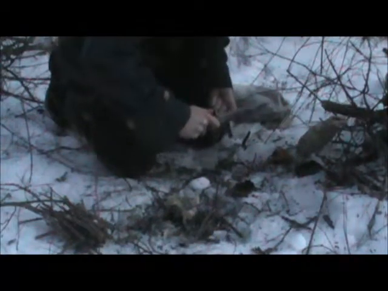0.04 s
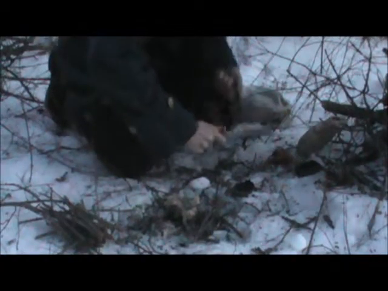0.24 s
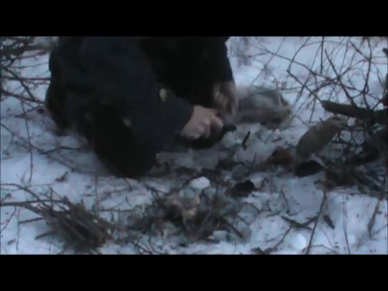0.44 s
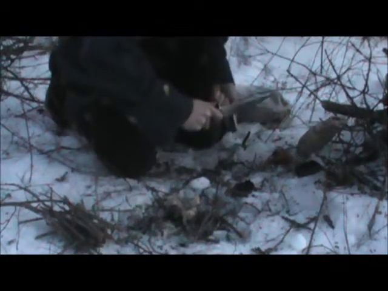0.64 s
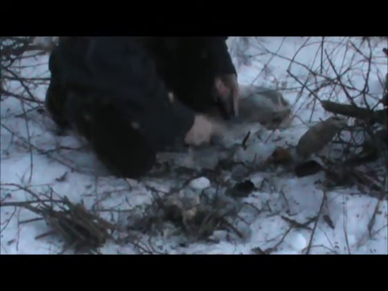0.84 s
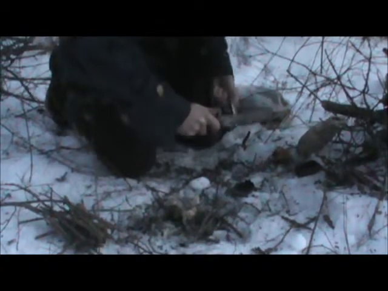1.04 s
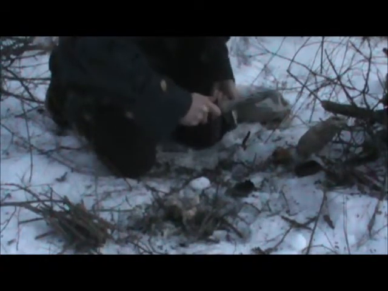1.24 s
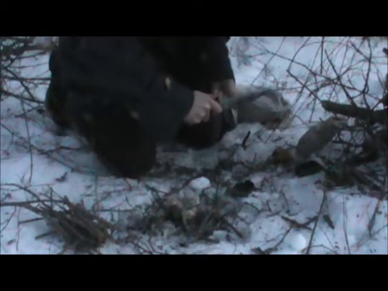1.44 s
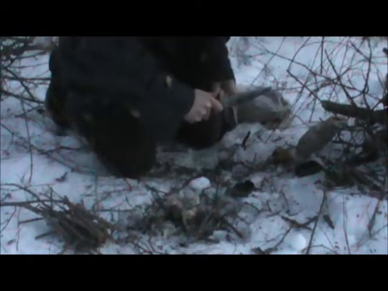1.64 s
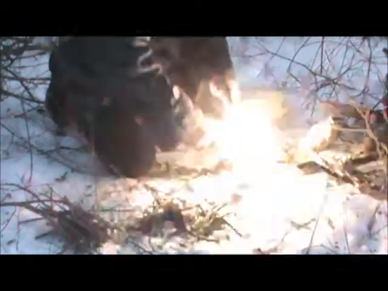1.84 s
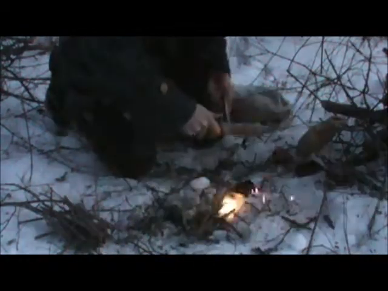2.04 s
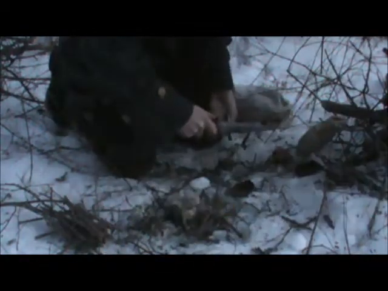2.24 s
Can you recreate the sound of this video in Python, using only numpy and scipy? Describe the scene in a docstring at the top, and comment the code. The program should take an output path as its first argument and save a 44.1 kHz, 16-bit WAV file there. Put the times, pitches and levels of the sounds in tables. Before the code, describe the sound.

Three fast strokes of a blade on a sparking rod, each a gritty zip with a metallic click, small resetting taps between, the last followed by crackling sparks; quiet open woods, faint low bumps, nearby microphone.

```python
"""A soft outdoor hush of shaped noise with scattered low bumps lies under everything.
A faint hum, a narrow resonance, fades early; a knife is drawn three times down a ferro rod in snowy woods.
Each stroke rasps in dense grains, bites deeper as it goes and leaves the steel's modes ringing.
Ticks set the blade back between strokes, and a light graze comes before the third.
Sparks fizz as grain noise after each stroke, most strongly after the third, and the last few pop singly."""
import sys
import numpy as np
from scipy import signal
from scipy.fft import rfft, irfft
from scipy.io import wavfile

SR = 44100
rng = np.random.default_rng(int(sys.argv[2]) if len(sys.argv) > 2 else 0)


def persist_wave(psi):
    """Save psi, clipped to +-1, as 16-bit WAV."""
    counts = np.round(np.clip(psi, -1, 1) * 32767).astype(np.int16)
    wavfile.write(sys.argv[1], SR, np.atleast_2d(counts).T)


N = 101429
T = np.arange(N) / SR  # seconds
HZ = np.fft.rfftfreq(N, 1 / SR)

# Colour of the outdoor air. Each row: frequency in Hz, relative gain in dB.
HUSH_COLOUR = [(15, -41), (25, -13), (45, -6), (80, -3), (105, -6.5), (160, -7), (280, -8), (540, -8.5),
               (720, -9), (1000, -13), (1400, -17.5), (2100, -22.5), (3700, -26), (7300, -27),
               (11000, -28.5), (15800, -30.5)]
# Rise and fall of the air. Each row: time in seconds, level in dB.
HUSH_LEVEL = [(0, -46.5), (.17, -46.5), (.38, -50.5), (.8, -49), (1.05, -48.5), (1.55, -47.5), (1.8, -47),
              (2.05, -51.5), (2.3, -50.5)]
# Stereo width of the air. Each row: frequency in Hz, left-right likeness (0 to 1).
HUSH_LIKENESS = [(60, 0.96), (180, 0.95), (550, 0.69), (1650, 0.15), (4970, 0.31), (15000, 0.88)]
# Soft low bumps. Each row: centre in seconds, Gaussian spread in seconds, level in dB.
BUMPS = [(0.04, 0.023, -57), (0.14, 0.038, -53), (1.057, .02, -60), (1.545, 0.011, -47.5),
         (1.82, 0.018, -50.5)]
# Knife strokes. Each row: blade grips in seconds, blade slips off in seconds, rasp at the grip in dB,
# rasp at the end in dB, bite in dB, singing steel in dB, lower edge of the bite in Hz, rasp centre in Hz.
STROKES = [(0.232, 0.265, -24, -28, -30, -28.5, 1190, 11000),
           (0.876, .899, -44.5, -28, -26.5, -22, 590, 9600),
           (1.866, 1.886, -29, -31.5, -27.5, -27, 855, 8300)]
# Colour of the rasp. Each row: frequency in Hz, relative gain in dB.
RASP_COLOUR = [(300, -32), (2200, -17), (3500, 2.5), (4700, -15), (6300, -9), (7300, -5), (9200, -4),
               (11000, 3.5), (11700, -12.5), (12800, 2), (14400, -20), (15500, -15)]
# Colour of the bite. Each row: frequency in Hz, relative gain in dB.
BITE_COLOUR = [(300, -24), (600, -11), (820, -3), (1100, -14.5), (1400, 1), (1780, -1), (2150, -16),
               (2550, -11), (2900, -4.5), (3650, -1.5), (4400, -12.5), (5100, -8.5), (8000, -10.5),
               (15000, -37)]
# Modes of the steel. Each row: free pitch in Hz, free t60 in seconds, pitch under pressure in Hz,
# half-width under pressure in Hz, relative level when scraped in dB, relative level when grazed in dB.
STEEL_MODES = [(6380, 0.026, 6420, 190, -2.5, -9), (9510, 0.076, 9480, 100, 1, -4.5),
               (12350, 0.086, 11000, 95, -11.5, -18), (15320, 0.071, 15330, 150, -13, -20)]
# Blade on rod. Each row: start in seconds, crack in dB, crack centre in Hz, knock of the rod in dB,
# then the ring of each of the four steel modes in dB.
KNOCKS = [ (0.2327, -33, 10000, -32, -36, -36, -60, -66), (.2385, -29, 10800, -68, -44, -17.5, -13.5, -26),
          (0.262, -18, 4200, -31, -20, -27, -17.5, -41), (0.6626, -25, 7300, -26.5, -24.5, -36, -51, -44),
          (0.8632, -41, 8500, -60, -43, -45, -62, -70), (0.8957, -23.5, 1930, -24, -39, -55, -53, -58),
          (.8970, -25.5, 8500, -45, -20, -28, -32, -42), (1.2986, -38, 6500, -34, -32.5, -43, -54, -47),
          (1.8647, -17.5, 8450, -46, -32, -20.5, -34, -39), (1.884, -18, 8000, -36, -21, -24, -46, -36)]
# Colour of the cracks. Each row: frequency in Hz, relative gain in dB.
CRACK_COLOUR = [(500, -13), (1600, 5), (2400, -15), (3200, 7), (3900, 0), (4400, -26), (5400, -3),
                (6300, -20), (7000, -3.5), (8400, 11), (10500, 0.5), (13000, -4.5), (15500, -11)]
# Modes of the hand-damped rod. Each row: frequency in Hz, t60 in seconds, relative level in dB.
ROD_MODES = [(3170, 0.0081, 1.5), (3770, 0.011, -0.5), (4960, 0.0083, -3.5)]
# Swells of fizz. Each row: full from, in seconds, full until, in seconds, level in dB,
# rise time constant in seconds, fall time constant in seconds.
FIZZ_SWELLS = [(0.264, 0.307, -47, 0.0067, 0.015), (0.9, 0.911, -39.5, 0.0045, 0.0057),
               (1.881, 1.915, -33, 0.02, 0.014), (1.97, 2.0, -53.5, .01, 0.067)]
# Colour of fizz and pops. Each row: frequency in Hz, relative gain in dB.
FIZZ_COLOUR = [(400, -30), (1100, -15.5), (1900, -5), (3000, -2.5), (4500, -3.5), (8000, 1), (11500, 2.5),
               (13200, -6), (15500, -6)]
# Last sparks bursting. Each row: start in seconds, level in dB.
POPS = [(1.9713, -38), (1.977, -40), (1.985, -41), (1.996, -45), (2.023, -46), (2.0645, -41)]
# Stereo lean of knife and sparks. Each row: frequency in Hz, left minus right in dB.
PAN = [(300, -14), (1300, 1.5), (2400, -3.5), (4400, -2), (8500, -4), (12500, -2.5), (15500, -0.5)]

BUMP_HZ, BUMP_OCTAVES = 63, 0.36
HUM_HZ, HUM_WIDTH_HZ, HUM_DB, HUM_END_S, HUM_FADE_S = 277.7, 3.8, -60.5, 0.52, 0.11
ATTACK_S, RELEASE_S = 0.0049, 0.0016
BITE_RISE_S, BITE_LEAD_S, BITE_FALL_S = 0.0092, 0.0024, 0.0031  # digs in just before slipping off
CHIPS_PER_S, CHIP_SPREAD_DB = 12000, 2.5
CHATTER_HZ, CHATTER_DB = 160, 1.3  # the edge drags unevenly
RASP_OCTAVES = 0.86
CRACK_S, CRACK_OCTAVES, RING_RISE_S = 0.0016, 0.47, 0.00017
FIZZ_PER_S, FIZZ_SPREAD_DB = 9000, 0  # all grains the same size
POP_S, POP_HZ, POP_OCTAVES = 0.0015, 6850, 1
GRAZE_S, GRAZE_SPREAD_S = 1.483, 0.029  # the blade slides lightly back up
GRAZE_DB, GRAZE_NARROWING = -45.5, 0.54
GRAZE_RASP_DB, GRAZE_HZ, GRAZE_OCTAVES = -53.5, 7050, 0.61
GROUND_T60, GROUND_DB, BITE_GROUND_DB = 0.017, -25.5, -8
WOODS_T60, WOODS_DB = 0.12, -23
EDGE_HZ = 15950


def amp(db):
    """Decibels to gain."""
    return 10 ** (np.asarray(db) / 20)


def unit(x):
    """Scales to rms 1."""
    return x / np.sqrt(np.mean(x ** 2) + 1e-20)


def read(points):
    """Reads a table over frequency, joined on a log axis."""
    hz, value = np.transpose(points)
    return np.interp(np.log(HZ + 1), np.log(hz + 1), value)


def shaped(x, gain):
    """Filters by a gain over frequency, to rms 1."""
    return unit(irfft(rfft(x) * gain, N))


def hump(hz, octaves):
    """Gain of one broad hump around hz."""
    return 1 / (1 + (np.log2((HZ + 1) / hz) / octaves) ** 2 / 2)


def band(hz, octaves):
    """Noise in one broad hump around hz."""
    return shaped(rng.standard_normal(N), hump(hz, octaves))


def grains(per_s, spread_db):
    """A dense random train of tiny clicks; any spread makes their sizes uneven."""
    size = amp(spread_db * np.minimum(rng.exponential(1, N), 4))
    sign = rng.choice([-1., 1.], N)
    present = rng.random(N) < per_s / SR
    return unit(size * sign * present)


def swell(start, end, rise_s, fall_s):
    """Exponential rise up to start, hold, exponential fall after end."""
    return np.exp(np.minimum(T - start, 0) / rise_s - np.maximum(T - end, 0) / fall_s)


def burst(start, decay_s):
    """Sudden onset and exponential decay."""
    return (T >= start) * np.exp(-np.maximum(T - start, 0) / decay_s)


def sing(hz, width_hz):
    """A narrow resonance kept going by random grains."""
    return shaped(grains(CHIPS_PER_S, CHIP_SPREAD_DB), 1 / (1 + ((HZ - hz) / width_hz) ** 2))


def ring(start, hz, t60, db):
    """One struck mode dying away."""
    t = np.maximum(T - start, 0)
    decay = amp(db - 60 * t / t60)
    return decay * (1 - np.exp(-t / RING_RISE_S)) * np.sin(2 * np.pi * hz * t)


def echoes(x, t60, delay_s):
    """Scattered reflections, different in each ear."""
    t = T[:SR // 2]
    tail = rng.standard_normal((2, len(t))) * amp(-60 * t / t60) * (t > delay_s)
    tail /= np.linalg.norm(tail, axis=1, keepdims=True)
    return signal.fftconvolve(x[None], tail, axes=1)[:, :N]


def hush():
    """Soft outdoor noise throughout, with scattered low bumps and a faint hum that fades early."""
    alike = np.clip(read(HUSH_LIKENESS), 0, 1)
    mid_side_gain = np.sqrt([1 + alike, 1 - alike])
    mid, side = rfft(rng.standard_normal((2, N))) * mid_side_gain * amp(read(HUSH_COLOUR))
    air = unit(irfft(np.array([mid + side, mid - side]), N))
    air = air * amp(np.interp(T, *np.transpose(HUSH_LEVEL)))
    bumps = sum(amp(db) * np.exp(-((T - s) / spread) ** 2 / 2) for s, spread, db in BUMPS)
    hum = amp(HUM_DB) * swell(0, HUM_END_S, HUM_FADE_S, HUM_FADE_S) * sing(HUM_HZ, HUM_WIDTH_HZ)
    return air + bumps * band(BUMP_HZ, BUMP_OCTAVES) + hum


def scrapes():
    """The edge tears chips off the rod: a bright rasp with singing steel, and a lower bite near the end."""
    rasp, bite = np.zeros((2, N))
    drag = shaped(rng.standard_normal(N), np.exp(-(HZ / CHATTER_HZ) ** 2))
    chatter = unit(amp(CHATTER_DB * drag))
    steel = unit(sum(amp(db) * sing(hz, width) for _, _, hz, width, db, _ in STEEL_MODES))
    for grip, slip, first_db, last_db, bite_db, sing_db, low_hz, rasp_hz in STROKES:
        slope = amp(np.interp(T, [grip, slip], [first_db - last_db, 0]))
        force = swell(grip, slip, ATTACK_S, RELEASE_S) * slope
        rasp_gain = amp(read(RASP_COLOUR)) * hump(rasp_hz, RASP_OCTAVES)
        chips = shaped(grains(CHIPS_PER_S, CHIP_SPREAD_DB), rasp_gain)
        rasp += force * (amp(last_db) * chatter * chips + amp(sing_db) * steel)

        low_cut = HZ ** 4 / (HZ ** 4 + low_hz ** 4)
        gouge = shaped(grains(CHIPS_PER_S, CHIP_SPREAD_DB), amp(read(BITE_COLOUR)) * low_cut)
        deepest = slip - BITE_LEAD_S
        bite += amp(bite_db) * swell(deepest, deepest, BITE_RISE_S, BITE_FALL_S) * gouge
    return rasp, bite


def knocks():
    """The blade lands, catches or slips off: a short crack, a dull rod knock, then freely ringing steel."""
    out = np.zeros(N)
    for start, crack_db, crack_hz, rod_db, *ring_db in KNOCKS:
        crack = shaped(band(crack_hz, CRACK_OCTAVES), amp(read(CRACK_COLOUR)))
        out += amp(crack_db) * burst(start, CRACK_S) * crack
        out += sum(ring(start, hz, t60, rod_db + db) for hz, t60, db in ROD_MODES)
        out += sum(ring(start, hz, t60, db) for (hz, t60, *_), db in zip(STEEL_MODES, ring_db))
    return out


def sparks():
    """Burning shavings fizz after each stroke as dense grains; the last few burst one by one."""
    colour = amp(read(FIZZ_COLOUR))
    fizz = shaped(grains(FIZZ_PER_S, FIZZ_SPREAD_DB), colour)
    fizz_level = sum(amp(db) * swell(start, end, rise, fall) for start, end, db, rise, fall in FIZZ_SWELLS)
    pop_level = sum(amp(db) * burst(start, POP_S) for start, db in POPS)
    return fizz_level * fizz + pop_level * shaped(band(POP_HZ, POP_OCTAVES), colour)


def graze():
    """A light slide along the rod that only just makes the steel sing."""
    modes = [amp(db) * sing(hz, width * GRAZE_NARROWING) for hz, _, _, width, _, db in STEEL_MODES]
    steel = unit(sum(modes))
    pressure = np.exp(-((T - GRAZE_S) / GRAZE_SPREAD_S) ** 2 / 2)
    return pressure * (amp(GRAZE_DB) * steel + amp(GRAZE_RASP_DB) * band(GRAZE_HZ, GRAZE_OCTAVES))


def place(x, ground_db):
    """Leans a sound mostly right, with quick reflections off the ground and a faint tail from the trees."""
    ground = amp(ground_db) * echoes(x, GROUND_T60, delay_s=0.003)
    woods = amp(WOODS_DB) * echoes(x, WOODS_T60, delay_s=0.014)
    left_right_db = np.outer([.5, -.5], read(PAN))
    return irfft(rfft(x + ground + woods) * amp(left_right_db), N)


def scene():
    """Knife, rod and sparks in front of the quiet woods."""
    rasp, bite = scrapes()
    bright = rasp + knocks() + graze() + sparks()
    return place(bright, GROUND_DB) + place(bite, BITE_GROUND_DB) + hush()


def record(dry):
    """The recorder's band limit: a steep low-pass at the top of the treble."""
    low_pass = signal.firwin(401, EDGE_HZ, window=("kaiser", 9), fs=SR)
    return signal.oaconvolve(dry, low_pass[None], "same")


dry = scene()
out = record(dry)
persist_wave(out)
```